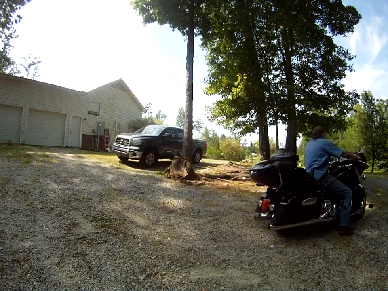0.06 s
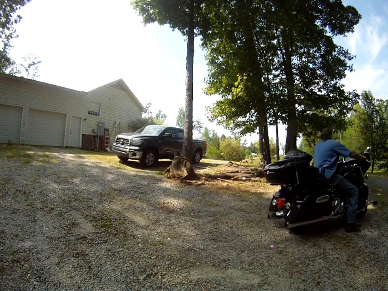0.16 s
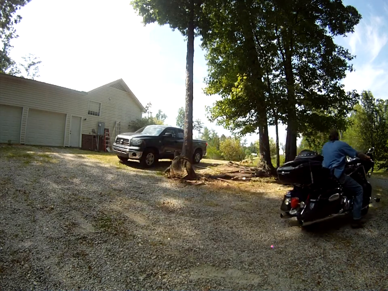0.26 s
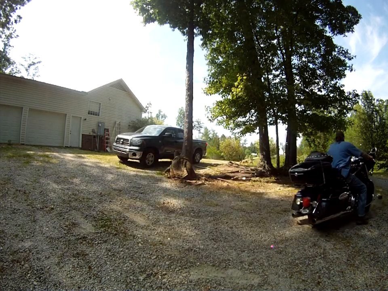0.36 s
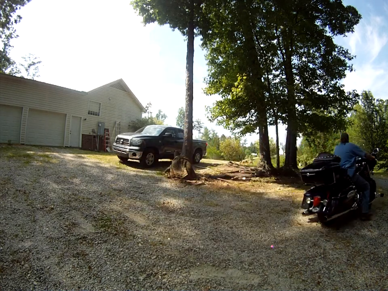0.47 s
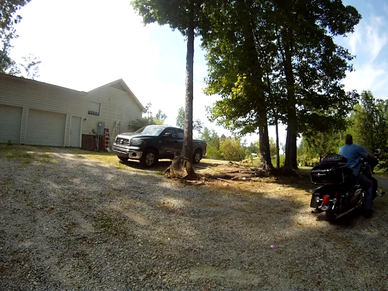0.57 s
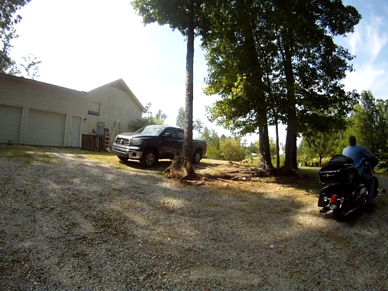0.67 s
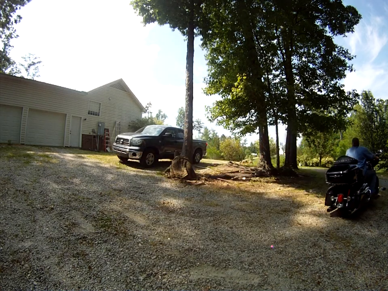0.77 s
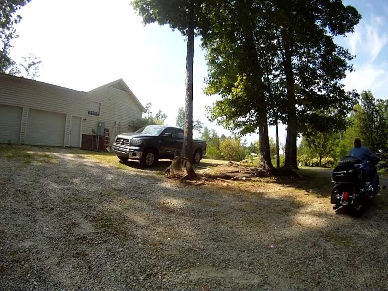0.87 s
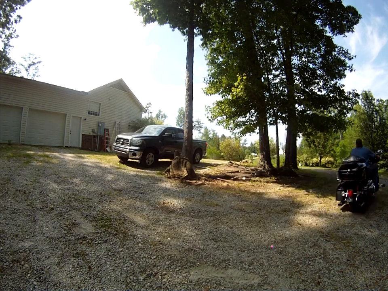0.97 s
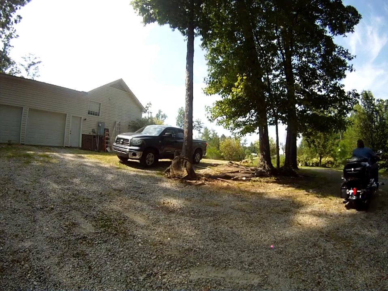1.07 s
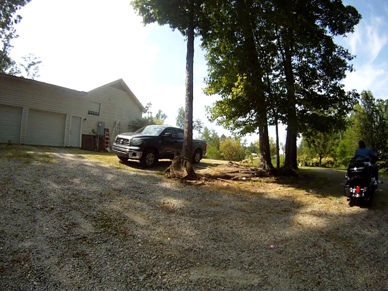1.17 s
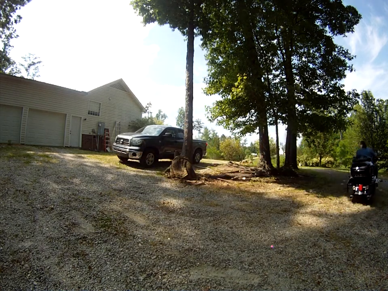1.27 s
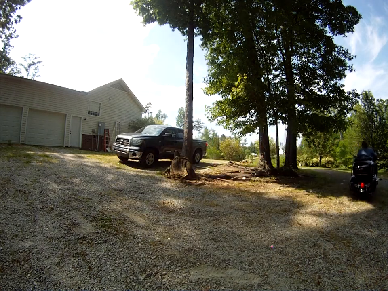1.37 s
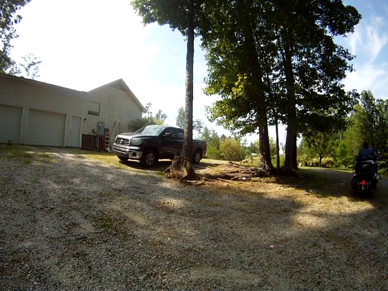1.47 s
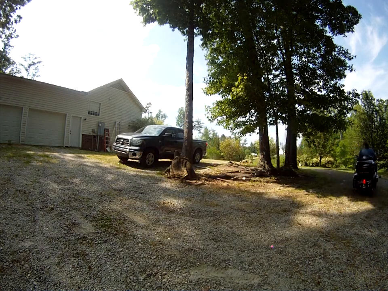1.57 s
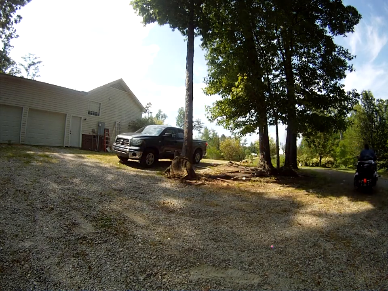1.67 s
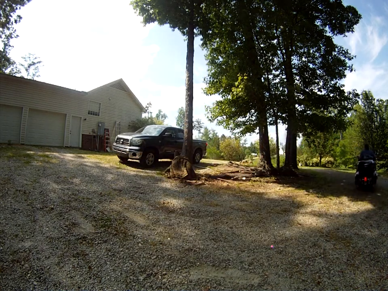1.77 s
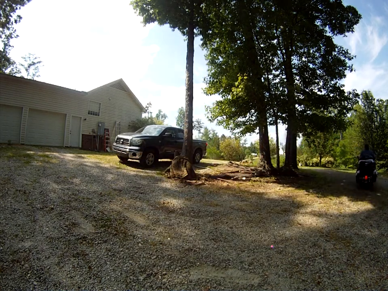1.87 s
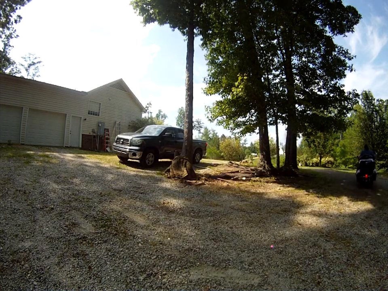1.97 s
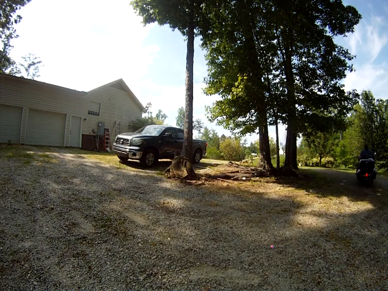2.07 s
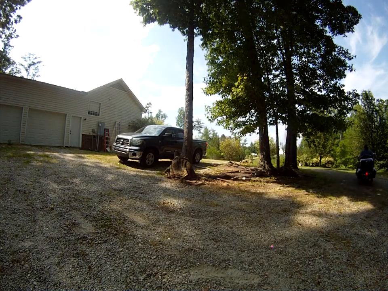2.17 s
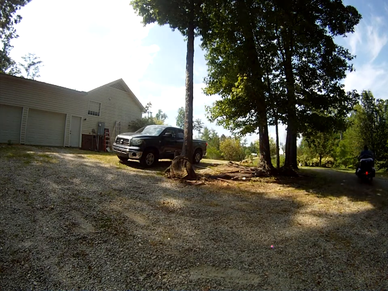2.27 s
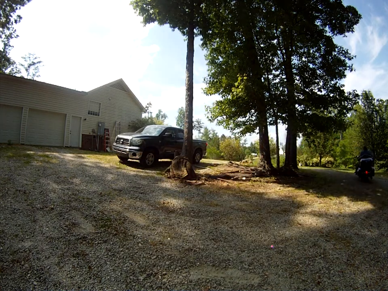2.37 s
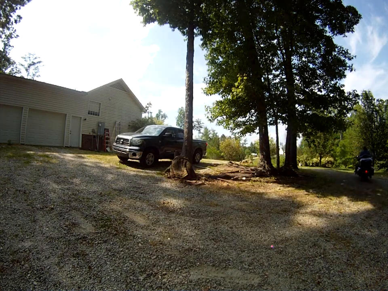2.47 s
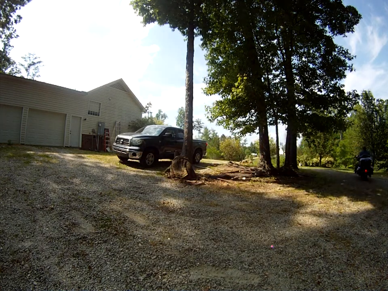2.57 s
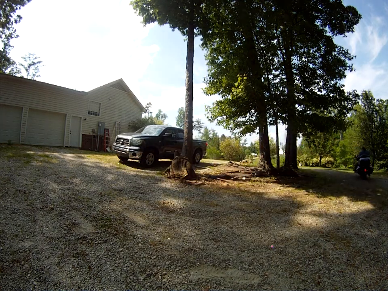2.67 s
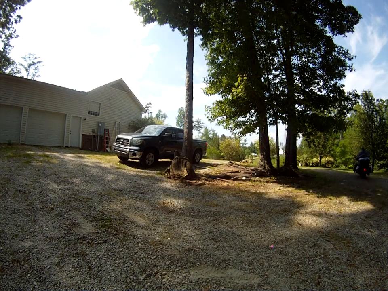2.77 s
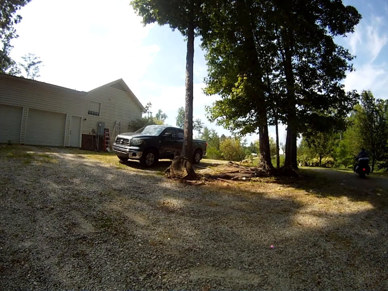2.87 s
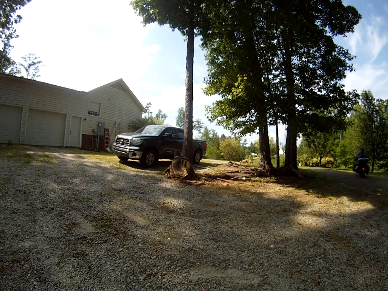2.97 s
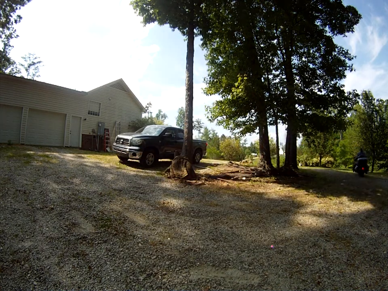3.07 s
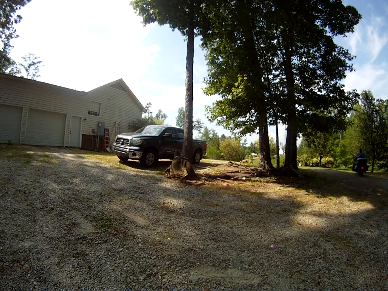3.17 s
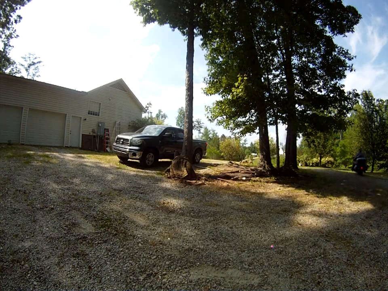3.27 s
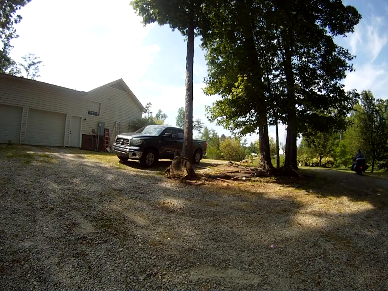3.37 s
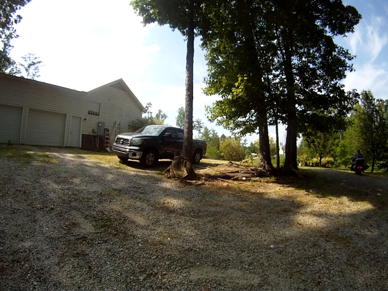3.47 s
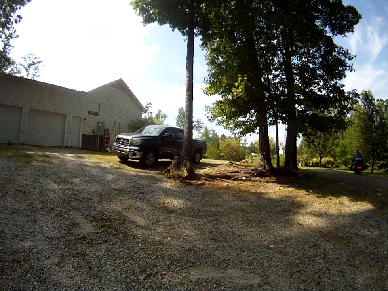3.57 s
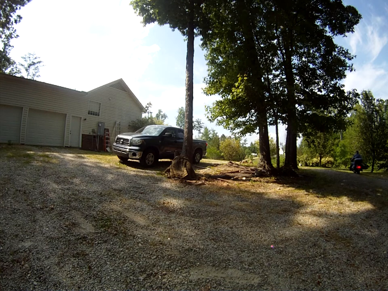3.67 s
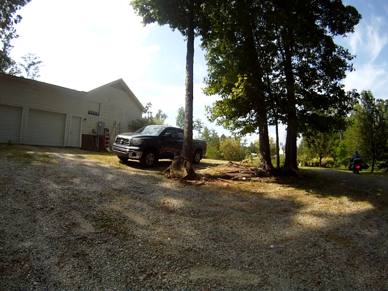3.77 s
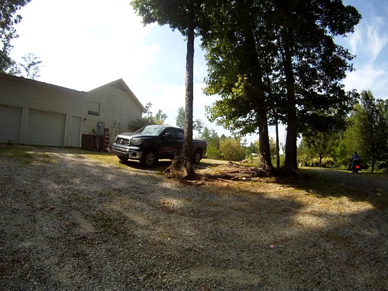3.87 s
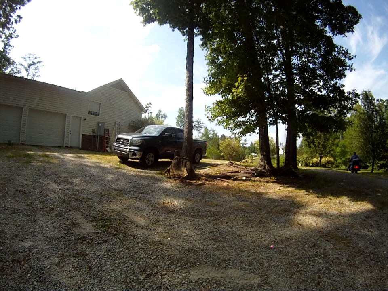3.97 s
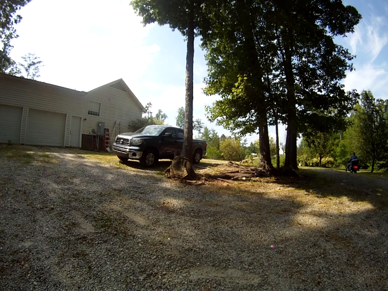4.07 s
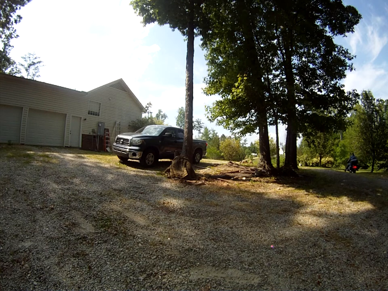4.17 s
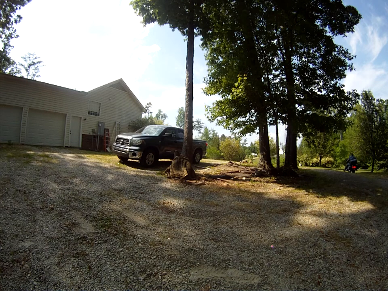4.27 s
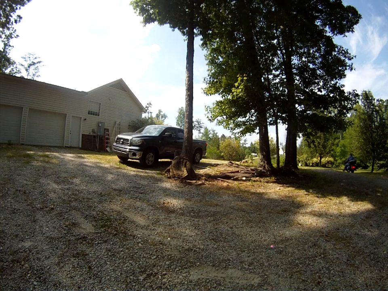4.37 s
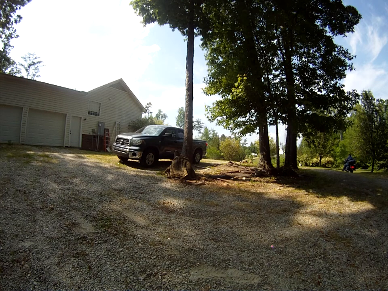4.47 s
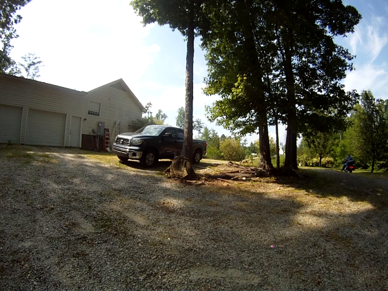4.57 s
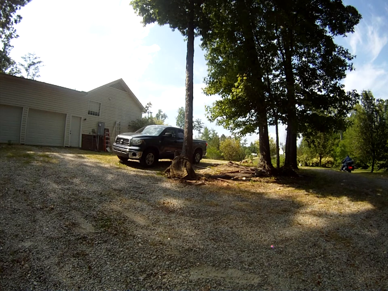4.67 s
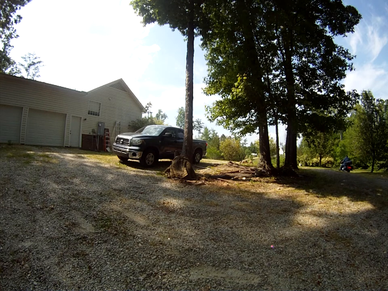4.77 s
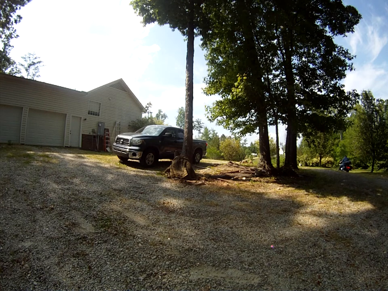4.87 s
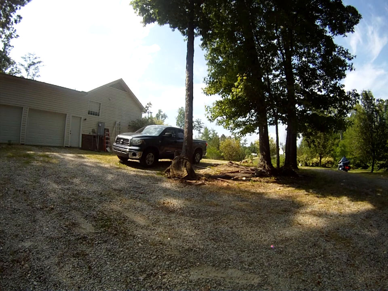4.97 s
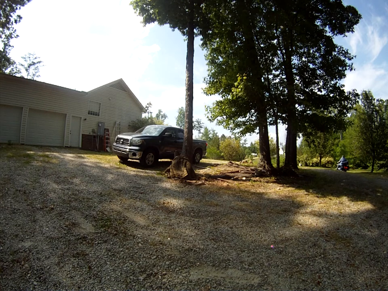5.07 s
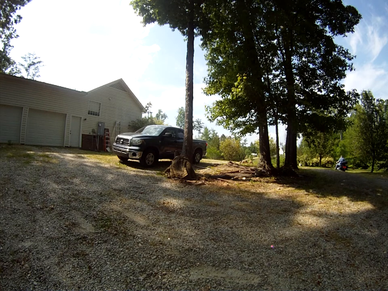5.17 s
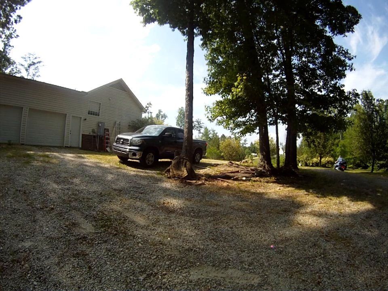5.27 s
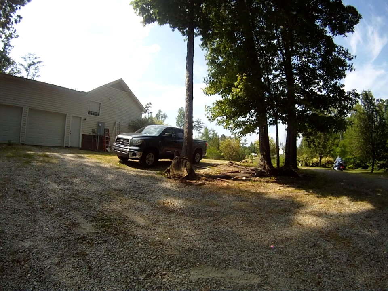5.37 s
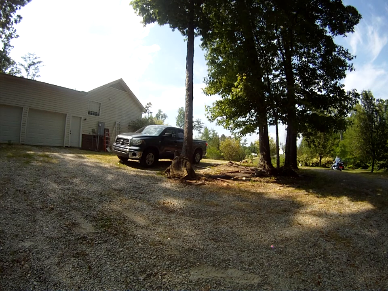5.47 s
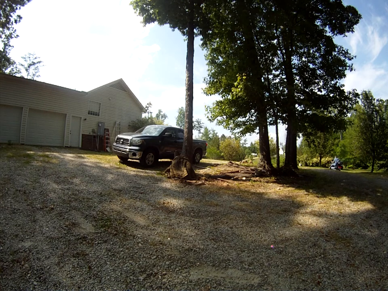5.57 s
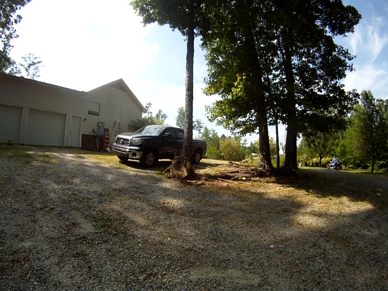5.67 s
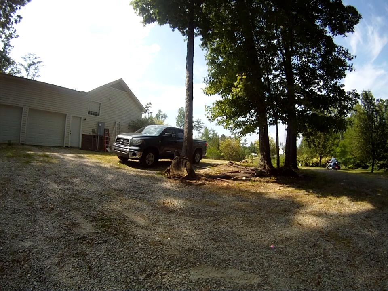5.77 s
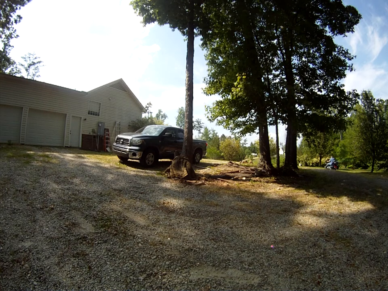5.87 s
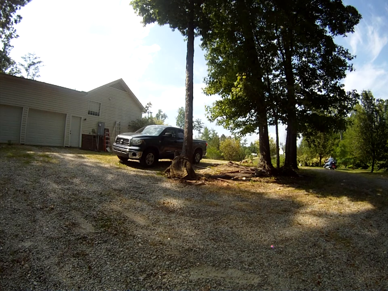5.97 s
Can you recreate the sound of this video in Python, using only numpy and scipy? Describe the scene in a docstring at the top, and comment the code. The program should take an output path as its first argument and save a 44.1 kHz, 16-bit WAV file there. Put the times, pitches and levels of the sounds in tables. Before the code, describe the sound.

A large motorcycle starts out close and loud on a gravel driveway, its exhaust a low, uneven, pulsing lope. In the first 0.3 seconds hollow luggage boxes knock and gravel crunches, with metallic engine clatter and tyre hiss. The revs sag around 0.4 seconds as a stone snaps. From 0.7 to 1.8 seconds the engine pulls hard with a barking note and faint surges of gear whine. It drops briefly at 2 seconds, picks up again, then cruises steadily from about 3.5 seconds, fading all the while. Single stones pop between 1.7 and 3.6 seconds. Soft, distant knocks come around 4.5 seconds. Very faint, breathy high tones rise near the end, and a small bird gives four quiet rising chirps from 5.6 to 6 seconds. A thin yard echo, steady low rumble and slight treble fizz lie underneath.

```python
"""On a gravel drive by a garage, a touring motorcycle slips its clutch and pulls away.
Its V4 engine fires unevenly: four exhaust puffs a cycle make a low lope that barks under load.
Engine speed, throttle and distance set how loud the exhaust, clatter and tyres are. Luggage knocks,
stones snap, gears whine in step with the engine, and a small bird chirps at the end.
The camera samples coarsely and holds each sample, which mirrors a faint fizz into the treble."""
import sys
import numpy as np
from scipy import signal
from scipy.fft import rfft, irfft, next_fast_len
from scipy.io import wavfile
from scipy.ndimage import map_coordinates

SR = 44100
rng = np.random.default_rng(int(sys.argv[2]) if len(sys.argv) > 2 else 0)


def unload_wav(signal):
    """Save mono or channel-first audio to the path in sys.argv[1] as 16-bit WAV at rate SR, clipped to [-1, 1]."""
    wavfile.write(
        sys.argv[1],
        SR,
        np.round(np.clip(np.atleast_2d(signal).T, -1, 1) * 32767).astype(np.int16),
    )


N = 265923
TIME = np.arange(N) / SR


def amp(db):
    """Turn decibels into a gain."""
    return 10 ** (np.asarray(db) / 20)


def unit(x):
    """Scale a signal to an average (rms) size of 1."""
    return x / np.sqrt(np.mean(x ** 2) + 1e-20)


def curves(rows):
    """Join a table's rows with straight lines: one curve for each column after the time."""
    times, *columns = np.transpose(rows)
    return [np.interp(TIME, times, column) for column in columns]


def wobble(rate):
    """A smooth random curve through `rate` points a second."""
    points = rng.standard_normal(int(N * rate / SR) + 4)
    return map_coordinates(points, [TIME * rate])


def coloured(x, points, size=32768):
    """Shape the tone of x with (frequency [Hz], level [dB]) points; the result has rms 1."""
    hz, db = np.transpose(points)
    bins = np.fft.rfftfreq(size, 1 / SR)
    gain = amp(np.interp(np.log(bins + 1), np.log(hz), db))
    # folding the cepstrum makes the filter ring only after a sound, never before it
    cepstrum = irfft(np.log(gain))
    cepstrum[1:size // 2] *= 2
    cepstrum[size // 2 + 1:] = 0
    response = irfft(np.exp(rfft(cepstrum)))
    return unit(signal.fftconvolve(x, response)[:N])


def resonant(x, modes):
    """Let x ring a set of resonances of alternating sign; the result has rms 1."""
    size = next_fast_len(N + SR)
    f = np.fft.rfftfreq(size, 1 / SR)
    response = sum((-1) ** k * amp(db) * 1j * f * width / (hz * hz - f * f + 1j * f * width)
                   for k, (hz, width, db) in enumerate(modes))
    return unit(irfft(rfft(x, size) * response, size)[:N])


def add(track, start, sound):
    """Mix a sound into a track at `start` seconds."""
    part = track[max(round(start * SR), 0):][:len(sound)]
    part += sound[:len(part)]


# how fast the engine's crank turns (time [s], speed [turns per minute])
ENGINE_SPEED = [(0, 1602), (.166, 1588), (.359, 951), (.686, 987), (.963, 1341), (1.137, 1248),
                (1.309, 1362), (1.842, 1410), (2.014, 856), (2.38, 1317), (2.633, 1105), (2.857, 1110),
                (3.127, 1002), (3.434, 1116), (4.39, 1164), (4.579, 1211), (5.301, 1187), (6.03, 1297)]
def rpm():
    """The engine's speed at every moment."""
    return curves(ENGINE_SPEED)[0]


# the rider eases off, pulls hard, shuts off briefly, then cruises (time [s], opening [0-1])
THROTTLE = [(0, 0.64), (.27, 0.18), (.41, 0.51), (.5, 0.1), (.68, 0.58), (1.05, 0.68), (1.19, 0.81),
            (1.42, 0.74), (1.69, 0.86), (1.715, 0.55), (1.99, 0.09), (2.18, 0.49), (2.45, 0.56),
            (3.3, 0.39), (3.75, 0.35), (4.7, 0.35), (5, 0.52), (6.03, 0.67)]
def throttle():
    """How far the throttle is open at every moment."""
    return curves(THROTTLE)[0]


def load():
    """How hard the engine works, 0-1: it builds most as the throttle nears wide open."""
    return throttle() ** 2


def doublings(start_m=2.89, accel_m_per_s2=0.739):
    """How many times the distance has doubled as the motorcycle speeds away."""
    travelled = accel_m_per_s2 * TIME ** 2 / 2
    return np.log2(1 + travelled / start_m)


def loudness(full_db, shut_loss_db, revs_db, launch_db):
    """One part's gain: it follows throttle and engine speed, and halves as the distance doubles."""
    revs = np.log2(rpm() / 1200)  # doublings above cruising speed
    launch = np.exp(-TIME / 0.55)  # the strain of moving off dies away
    db = full_db - shut_loss_db * (1 - throttle()) + revs_db * revs + launch_db * launch
    return amp(db) / 2 ** doublings()


# when each cylinder puffs in a cycle of two crank turns (angle [degrees])
PUFF_ANGLES = [0, 180, 278, 450]
# each cylinder's strength with no load (level [dB])
CYLINDER_DB = [-11, -7, 0, -5]
def firings(scatter_db, jitter_s, start_degrees=-253):
    """One click per exhaust puff; no two burn quite alike, and load evens out the cylinders."""
    angle = start_degrees + np.cumsum(rpm()) * 360 / 60 / SR
    due = (720 * np.arange(-1, 70)[:, None] + PUFF_ANGLES).ravel()
    size_luck, time_luck = rng.standard_normal((len(due), 2)).T
    on_time = np.interp(due, angle, np.arange(N))
    at = np.clip(on_time + jitter_s * SR * time_luck, 0, N - 1).astype(int)
    uneven_db = (1 - load()[at]) * np.resize(CYLINDER_DB, len(due))
    size = amp(uneven_db + scatter_db * size_luck)
    heard = (due > angle[0] - 30) & (due < angle[-1])
    return np.bincount(at[heard], size[heard], N)


def bursts(pulses, decay_s):
    """Noise that swells with each pulse and dies away."""
    t = np.arange(SR // 6) / SR
    swell = np.exp(-t / decay_s) * (1 - np.exp(-t / 0.0042))
    return unit(signal.fftconvolve(pulses, swell)[:N] * rng.standard_normal(N))


# the notes the silencers ring at (pitch [Hz], width [Hz], relative level [dB])
SILENCER_NOTES = [(43, 18.3, -6.5), (76.7, 40.5, 3.5), (116.2, 20.9, 6.5), (158, 19, -25)]
def boom(pulses):
    """Each puff makes the silencers ring with a low boom."""
    gain = loudness(full_db=-19.5, shut_loss_db=8, revs_db=0, launch_db=4)
    return gain * resonant(pulses, SILENCER_NOTES)


# the tone of each puff's sharp front (frequency [Hz], relative level [dB])
BARK_TONE = [(60, -18.5), (140, 10.5), (185, 3), (240, 7.5), (320, -8.5), (390, 2.5), (490, -0.5),
             (610, -5), (720, -35), (1150, -15.5), (1600, -45), (5500, -29.5)]
def bark(pulses):
    """The front of each puff is a hard bark when the engine is under load."""
    travel = round(.007 * SR)  # the fronts reach the outlet a little later
    fronts = np.pad(np.sqrt(pulses), (travel, 0))[:N]  # and differ less between cylinders
    gain = loudness(full_db=-28.5, shut_loss_db=12, revs_db=2, launch_db=10.5)
    return gain * load() * coloured(fronts, BARK_TONE)


# the tone of the swirling gas behind each front (frequency [Hz], relative level [dB])
CHUFF_TONE = [(60, -17.5), (150, -1), (200, -2), (290, -1), (380, -9.5), (550, -11.5), (690, -27),
              (840, -25.5), (1200, -28.5), (5500, -47)]
def chuff(pulses):
    """Swirling gas makes a soft chuff that gives way to the bark under load."""
    gas = coloured(bursts(pulses, decay_s=.025), CHUFF_TONE)
    gain = loudness(full_db=-30, shut_loss_db=9, revs_db=-1, launch_db=9.5)
    return gain * (1 - .85 * load()) * gas


# the tone of valves, gas hiss and rolling tyres (frequency [Hz], relative level [dB])
RUSH_TONE = [(200, -31.5), (550, 9.5), (850, 7), (1300, 0.5), (1600, -1), (2200, -1), (3200, -2.5),
             (4500, -5), (5500, -7.5)]
def clatter_and_tyres(pulses):
    """Valves clatter in time with the firings while the tyres hiss and crackle on gravel."""
    clatter = coloured(bursts(pulses, decay_s=0.0044), RUSH_TONE)
    hits = rng.random(N) < 500 / SR  # about 500 grains a second
    grains = hits * rng.standard_normal(N) * amp(0.81 * wobble(13))
    hiss = amp(1.63 * wobble(15)) * coloured(rng.standard_normal(N), RUSH_TONE)
    crackle = coloured(grains, RUSH_TONE)
    gain = loudness(full_db=-41, shut_loss_db=4.5, revs_db=3.5, launch_db=10)
    return gain * unit(hiss + .5 * crackle + 0.45 * clatter)


# the notes of the engine's metal cases and fins (pitch [Hz], width [Hz], relative level [dB])
CASE_NOTES = [(1296, 50, 2), (1833, 45, -2.5), (2105, 40, -2), (2400, 47, -5.5), (3147, 44, -3.5),
              (3800, 24, -8.5), (4460, 33, -5.5)]
def engine_cases(pulses):
    """The cases and fins ring under the clatter, most of all while moving off."""
    gain = loudness(full_db=-62, shut_loss_db=-0.5, revs_db=4, launch_db=22.5)
    return gain * resonant(bursts(pulses, decay_s=0.011), CASE_NOTES)


# the tone of still outdoor air and microphone hiss (frequency [Hz], relative level [dB])
AIR_TONE = [(20, 2.5), (40, 31.5), (200, 19.5), (700, -10.5), (1500, -24), (3000, -14), (4300, -5),
            (5500, -8.5)]
def air():
    """A steady low rumble with a faint hiss."""
    return amp(-43.5) * coloured(rng.standard_normal(N), AIR_TONE)


# a parked truck and the garage wall
# (starting delay [s], shortening per doubling of distance [s], relative level [dB])
ECHOES = [(.0169, .0052, -14), (.0617, .0062, -13)]
def echoes(x):
    """Dull echoes fill the gaps between puffs; their detour shrinks as the motorcycle leaves."""
    n = np.arange(N)
    copies = sum(amp(db) * np.interp(n - (delay - shrink * doublings()) * SR, n, x, left=0)
                 for delay, shrink, db in ECHOES)
    return signal.sosfilt(signal.butter(1, 900, fs=SR, output="sos"), copies)


def yard(x, fade_s):
    """The garage, truck and trees scatter a thin echo that falls 60 dB in fade_s."""
    t = np.arange(SR // 2) / SR
    tail = rng.standard_normal(len(t)) * amp(-60 * t / fade_s) * (t > .02)
    tail = signal.sosfilt(signal.butter(2, 140, "high", fs=SR, output="sos"), tail)
    return signal.fftconvolve(x, tail / np.linalg.norm(tail))[:N]


# jolts as the clutch bites, and later as the wheels cross a bump (time [s], level [dB])
KNOCKS = [(.031, -19.5), (.229, -30), (.293, -25), (4.447, -43), (4.468, -43), (4.491, -37.5), (4.539, -40),
          (4.565, -42), (4.748, -38.5)]
# the hollow luggage boxes' notes (pitch [Hz], relative level [dB], time to fall 60 dB [s])
BOX_NOTES = [(407, -7, 0.06), (608, -8.5, 0.064), (810, -11, .06), (1030, -10, 0.055), (1210, -13.5, .07)]
def luggage():
    """Each jolt rings the boxes a little differently, with a short rattle."""
    out, t = np.zeros(N), np.arange(SR // 8) / SR
    attack = 1 - np.exp(-t / .0006)
    for start, db in KNOCKS:
        ring = np.zeros(len(t))
        for hz, note_db, fade_s in BOX_NOTES:
            fade = amp(note_db + rng.normal(0, 1.8) - 60 * t / fade_s)
            ring += fade * np.sin(2 * np.pi * (hz * t + rng.random()))
        rattle = .12 * rng.standard_normal(len(t)) * np.exp(-t / .004)
        add(out, start, amp(db) * (ring + rattle) * attack)
    return out


# patches of loose gravel (time [s], half length [s], level [dB], treble edge [Hz])
CRUNCHES = [(0.032, 0.0067, -26.5, 4030), (0.418, 0.014, -43.5, 3840), (1.951, 0.0064, -46, 5060),
            (4.503, 0.054, -58, 1140)]
def gravel():
    """Patches of gravel give way with a crunch, duller far off."""
    out = np.zeros(N)
    for middle, half_length, db, edge_hz in CRUNCHES:
        tone = [(250, -20), (700, 0), (edge_hz, -3), (2 * edge_hz, -25)]
        swell = np.exp(-((TIME - middle) / half_length) ** 2)
        out += amp(db) * swell * coloured(rng.standard_normal(N), tone)
    return out


# stones squeezed out by the tyres (time [s], level [dB], pitch [Hz])
STONES = [(0.414, -24, 2560), (1.662, -33, 3060), (1.941, -36, 3500), (2.384, -26, 1050),
          (3.195, -29.5, 1460), (3.627, -37, 1730)]
def stones():
    """Single stones snap with a crack and a brief ring."""
    out, t = np.zeros(N), np.arange(SR // 20) / SR
    for start, db, hz in STONES:
        ring = np.sin(2 * np.pi * hz * t) * np.exp(-t / 0.00058)
        crack = 0.16 * rng.standard_normal(len(t)) * np.exp(-t / 0.0033)
        add(out, start, amp(db) * (ring + crack))
    return out


def airy_tone(hz, db, width_hz):
    """A narrow band of noise that follows a pitch and a level."""
    phase = 2 * np.pi * np.cumsum(hz) / SR
    return amp(db) * unit(wobble(width_hz) * np.cos(phase) + wobble(width_hz) * np.sin(phase))


# surges as the gears take up load (time [s], half length [s], level [dB], teeth [per crank turn])
GEAR_SURGES = [(0.524, 0.08, -49.5, 96), (0.826, 0.061, -42.5, 98), (0.997, 0.16, -48.5, 93),
               (1.646, 0.064, -51, 102), (2.27, 0.09, -60, 100), (2.495, 0.1, -56.5, 101),
               (2.764, 0.23, -60.5, 102)]
def gears(waver=.015, flutter_db=4.5):
    """Meshing teeth whine at a multiple of the engine speed; each surge swells, flutters and fades."""
    turns_per_s = rpm() / 60 * (1 + waver * wobble(25))
    flutter = unit(amp(flutter_db * wobble(34.85)))
    out = np.zeros(N)
    for middle, half_length, db, teeth in GEAR_SURGES:
        swell = np.exp(-((TIME - middle) / half_length) ** 2)
        out += swell * airy_tone(teeth * turns_per_s, db, width_hz=200)
    return flutter * out


# a faint high note far off (time [s], pitch [Hz], level [dB])
FAR_NOTE = [(4.2, 2100, -100), (4.8, 2090, -75), (6.03, 2150, -69)]
# a thin far whine about an octave lower (time [s], pitch [Hz], level [dB])
FAR_WHINE = [(4.4, 1010, -77), (5.4, 1028, -73), (5.82, 1023, -63), (6.03, 1028, -64)]
def far_tones():
    """Two faint, breathy tones rise in the distance near the end."""
    return airy_tone(*curves(FAR_WHINE), width_hz=57) + airy_tone(*curves(FAR_NOTE), width_hz=240)


# the bird's rising notes (time [s], level [dB])
CHIRPS = [(5.59, -61), (5.698, -57), (5.808, -55.5), (5.914, -57)]
def bird():
    """Each note starts on a steady pitch, sweeps upward and echoes round the yard."""
    out, progress = np.zeros(N), np.linspace(0, 1, round(0.05 * SR))
    hz = 2130 + 1050 * progress ** 2
    swell = np.sqrt(np.abs(np.sin(np.pi * progress))) * amp(-5 * progress)
    note = swell * np.sin(2 * np.pi * np.cumsum(hz) / SR)
    for start, db in CHIRPS:
        add(out, start, amp(db) * note)
    return 0.96 * out + 0.38 * yard(out, fade_s=.4)


def scene():
    """The motorcycle and its echoes, the still air, the far tones and the bird."""
    pulses = firings(scatter_db=.9, jitter_s=.00008)
    exhaust = boom(pulses) + bark(pulses) + chuff(pulses)
    machinery = clatter_and_tyres(pulses) + engine_cases(pulses)
    bike = exhaust + machinery + luggage() + gravel() + stones() + gears()
    spread = bike * amp(1.2 * doublings())  # echoes gain on the direct sound with distance
    reflections = echoes(spread) + amp(-13) * yard(spread, fade_s=0.79)
    return (bike + reflections + air() + far_tones() + bird())[None]


def record(dry, camera_hz=12000, hold_count=4, top_hz=15500):
    """The camera samples at a low rate and holds each value, mirroring the sound into the treble."""
    hz = np.fft.rfftfreq(N, 1 / SR)
    treble_cut = 1 / np.sqrt(1 + (hz / 5450) ** 44)  # removes what is too high to sample
    filtered = irfft(rfft(dry) * treble_cut, N)
    coarse = signal.resample(filtered, round(N * camera_hz / SR), axis=-1)
    held = signal.resample(np.repeat(coarse, hold_count, axis=-1), N, axis=-1)
    return irfft(rfft(held) * (hz < top_hz), N)


dry = scene()
out = record(dry)
unload_wav(out)
```